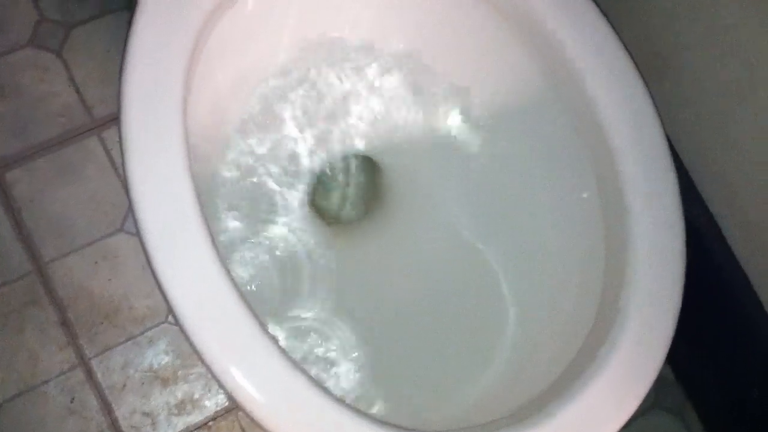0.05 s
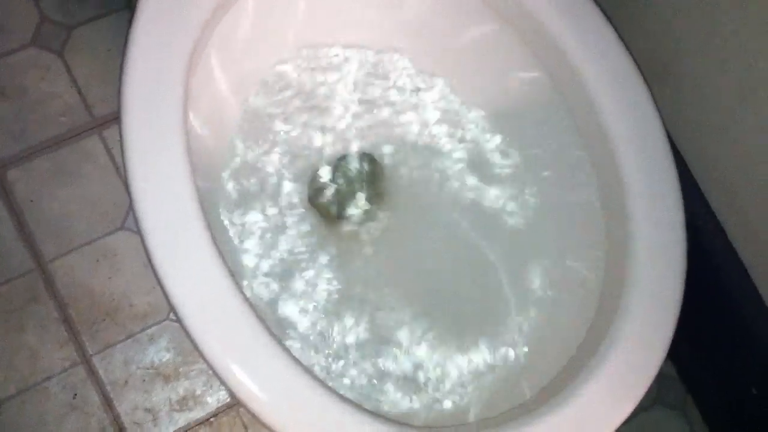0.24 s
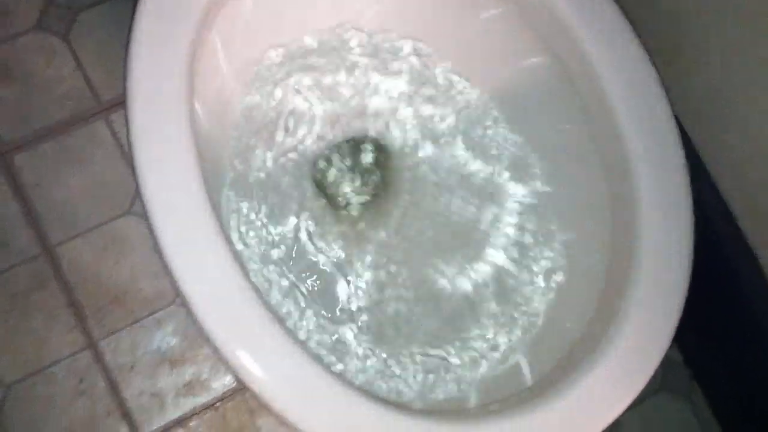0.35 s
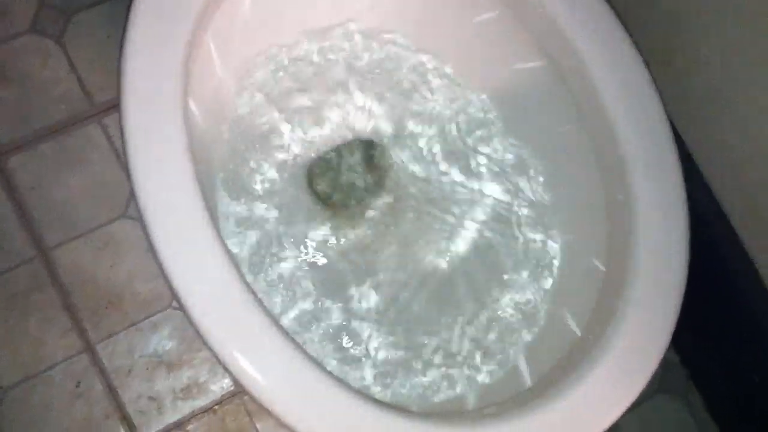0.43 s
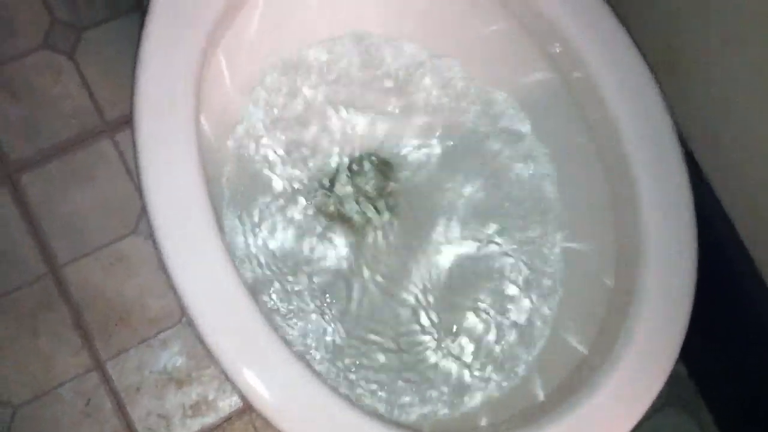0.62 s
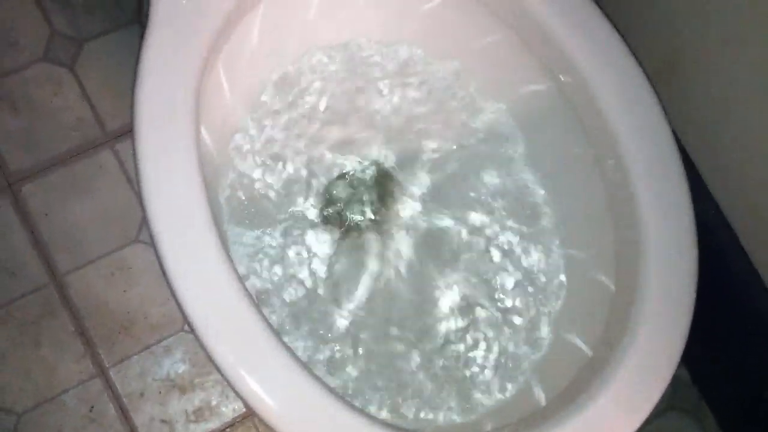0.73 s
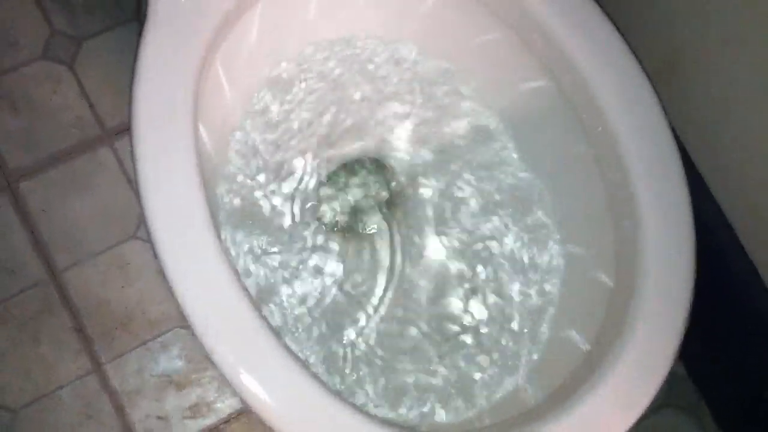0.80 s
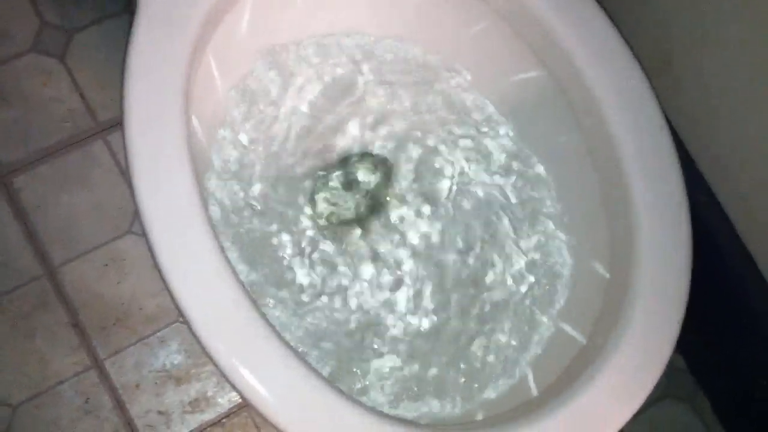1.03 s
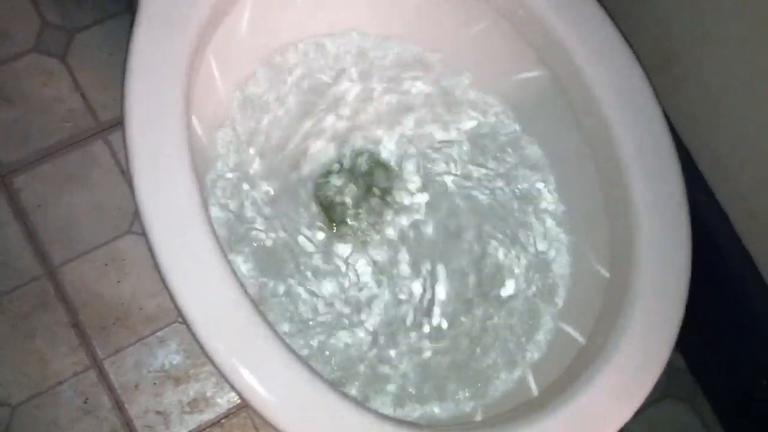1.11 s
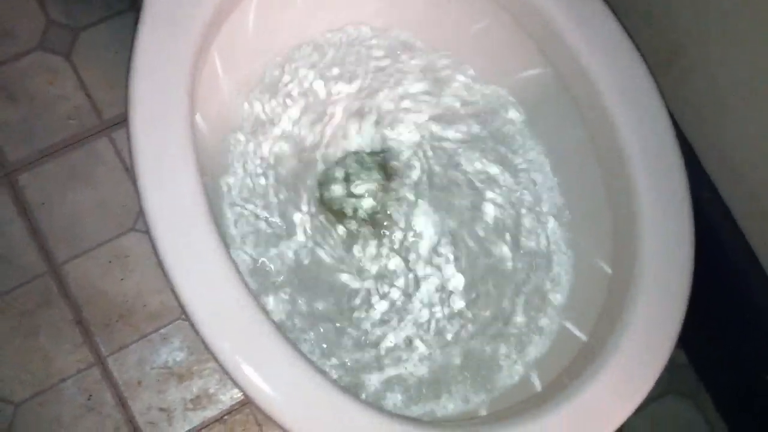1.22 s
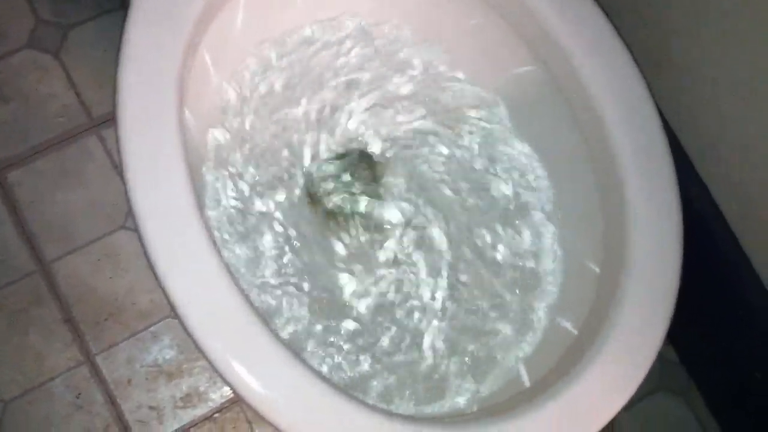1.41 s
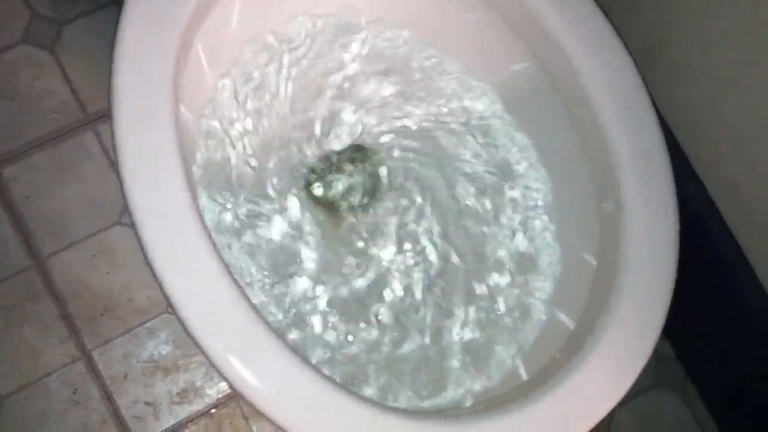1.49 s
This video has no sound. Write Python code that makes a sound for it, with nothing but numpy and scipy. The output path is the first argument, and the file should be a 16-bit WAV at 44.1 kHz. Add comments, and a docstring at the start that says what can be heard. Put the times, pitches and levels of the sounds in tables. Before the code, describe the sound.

A toilet flushes, heard close in a small tiled bathroom. Faint hollow tank sounds and sharp lever ticks come first, from 0 to 0.25 s. At about 0.27 s the valve opens with a loud boomy gush, short clang and bright splash, peaking until 0.4 s. Another click falls at 0.44 s. Water slaps the bowl around 0.6-0.75 s and faintly at 1.1 s, while a quieter, flickering swirl continues to the cut at about 1.55 s.

```python
"""A toilet is flushed in a small tiled bathroom. Lever and chain tick: short bursts of filtered noise.
The valve lifts with a hollow gush and a brief clang, and the tank's tube hums: noise through resonances.
Water runs from the rim as splash, wash and spray, and slaps the bowl in short pitched bursts of drops.
It swirls on while the air of bowl and drain rings in a few broad, flickering tones."""
import sys
import numpy as np
from scipy import signal
from scipy.fft import rfft, irfft, next_fast_len
from scipy.io import wavfile
from scipy.ndimage import uniform_filter1d

SR = 44100
rng = np.random.default_rng(int(sys.argv[2]) if len(sys.argv) > 2 else 0)


def inscribe(sig):
    """Save sig as 16-bit PCM at rate SR to the path in sys.argv[1].

    A 1-D sig is mono; a 2-D sig holds one channel per row.
    Samples are clipped to [-1, 1] before scaling.
    """
    pcm = np.round(np.clip(np.atleast_2d(sig).T, -1, 1) * 32767)
    wavfile.write(sys.argv[1], SR, pcm.astype(np.int16))


N = 68355  # samples


def amp(db):
    """Decibels to a linear factor."""
    return 10 ** (np.asarray(db) / 20)


def rms_one(x):
    """Scale to an rms of 1."""
    return x / np.sqrt(np.mean(x ** 2) + 1e-20)


def band_pass(x, order, low_hz, high_hz):
    """Keep only the band between two edges."""
    return signal.sosfilt(signal.butter(order, [low_hz, high_hz], "band", fs=SR, output="sos"), x)


def in_time(rows):
    """Columns of a curve table, one value per sample; the first and last rows hold outside the table."""
    start_s, *columns = np.transpose(rows)
    t = np.arange(N) / SR
    return [np.interp(t, start_s, column) for column in columns]


TANK_FADE_S, TANK_FADE_DB = 0.082, -4


def fading(rows):
    """A tank curve that sinks a little after its last row, then holds."""
    last_s, *last_db = rows[-1]
    sunk = (last_s + TANK_FADE_S, *(np.array(last_db) + TANK_FADE_DB))
    return in_time(list(rows) + [sunk])


def drift(rate_hz):
    """Slow chance with spread 1: noise through two equal poles at rate_hz, one value per 40 samples."""
    step = 40
    r = np.exp(-2 * np.pi * rate_hz * step / SR)
    noise = rng.standard_normal(N // step + 2002)
    slow = signal.lfilter([1], [1, -2 * r, r * r], noise)[2000:]  # drop the run-in
    return np.interp(np.arange(N) / step, np.arange(len(slow)), rms_one(slow))


DROPS_PER_S, DROP_SPREAD_DB = 3000, 3.5
DROP_SHARE = 0.55  # of the power; the rest is smooth noise


def water():
    """Turbulence: smooth noise mixed with a hail of uneven drops."""
    unevenness = np.minimum(rng.exponential(1, N), 5)
    sizes = amp(DROP_SPREAD_DB * unevenness) * rng.choice([-1, 1], N)
    drops = rms_one(sizes * (rng.random(N) < DROPS_PER_S / SR))
    return np.sqrt(DROP_SHARE) * drops + np.sqrt(1 - DROP_SHARE) * rng.standard_normal(N)


FLICKER_HZ = 22.2  # how fast the resonances flicker


def resonate(x, modes, flicker_db, steady, order=1):
    """Parallel resonances, each flickering on its own; steady 0-1 evens out their swells; rms 1."""
    out = 0
    for k, (pitch_hz, width_hz, level_db) in enumerate(modes):
        r = np.exp(-np.pi * width_hz / SR)
        gain = (1 - r * r) / 2
        stage = [gain, 0, -gain, 1, -2 * r * np.cos(2 * np.pi * pitch_hz / SR), r * r]
        ring = signal.sosfilt([stage] * order, x)
        power = uniform_filter1d(ring ** 2, size=SR // 60) / np.mean(ring ** 2)
        swell = np.sqrt(power + .03)
        level = amp(level_db + flicker_db * drift(FLICKER_HZ))
        out = out + (-1) ** k * level * ring / swell ** steady  # alternate signs
    return rms_one(out)


def coloured(spectrum, patchy_db):
    """Third-octave bands of water noise, each at its own level and patchy; rms 1."""
    pitch_hz, density_db = np.transpose(spectrum)
    source = [water(), water()]  # neighbouring bands take turns
    edges = pitch_hz[0] * 2 ** np.arange(0, np.log2(pitch_hz[-1] / pitch_hz[0]), 1 / 3)
    out = 0
    for k, low in enumerate(edges):
        high = low * 2 ** (1 / 3)
        band = band_pass(source[k % 2], 2, low, high)
        band_db = np.interp(np.log(low * high) / 2, np.log(pitch_hz), density_db)
        out = out + amp(band_db + patchy_db * drift(13.5)) * band
    return rms_one(out)


def puffs(rows, source, rise_s, span):
    """Each row is a short burst around its pitch: it rises, then dies fast."""
    out, t = np.zeros(N + SR), np.arange(SR // 4) / SR
    for start_s, level_db, pitch_hz, t60_s in rows:
        i = int(start_s * SR)
        shape = amp(level_db - 60 * t / t60_s) * np.minimum(t / rise_s, 1)
        burst = band_pass(source[i:i + len(t)], 3, pitch_hz / span, pitch_hz * span) * shape
        out[i:i + len(t)] += rms_one(burst) * np.sqrt(np.mean(shape ** 2))
    return out[:N]


ROOM_T60_S, ROOM_DB = 0.21, -4


def bathroom(x):
    """Echoes between tiled walls: eight feedback delays of 11 to 29 ms, computed as a spectrum."""
    size = next_fast_len(N + SR)
    w = 2 * np.pi * np.arange(size // 2 + 1) / size
    echo = 0
    for k, lag in enumerate((SR * np.linspace(.011, .029, 8)).astype(int)):
        feedback = amp(-60 * lag / SR / ROOM_T60_S)
        loop = 1 / (1 - feedback * np.exp(-1j * w * lag)) - 1  # without the direct sound
        echo = echo + (-1) ** k * loop
    return irfft(rfft(x, size) * echo, size)[:N] / np.sqrt(8)


# drain drone: start_s, level_db
DRAIN_LEVEL = [(0.0, -54.5), (0.132, -62.5), (0.272, -41.5), (0.354, -78), (0.508, -60.5), (0.6, -47.5),
               (1.55, -49.5)]
# resonances of the drain: pitch_hz, width_hz, level_db (relative)
DRAIN_TONES = [(99, 14, -11.5), (165.4, 7.6, 2.5), (224, 26, -6)]


def drain():
    """The turning water sets the air of the drain droning."""
    (level_db,) = in_time(DRAIN_LEVEL)
    return amp(level_db) * resonate(water(), DRAIN_TONES, flicker_db=1.5, steady=0.37)


# hum of the tank's tube: start_s, main_db, side_db
HUM_LEVEL = [(0.0, -64, -66.5), (0.055, -38, -59), (0.094, -43, -60), (0.115, -71, -53),
             (0.152, -38.5, -52), (0.2, -48, -53), (0.268, -40, -45), (0.335, -32.5, -32),
             (0.37, -29, -30.5), (0.44, -50, -38), (0.52, -38.5, -41.5), (0.565, -38, -35), (0.6, -38, -53),
             (0.636, -70, -46), (0.76, -48, -42), (0.88, -52, -48)]
# main and side resonances of the tube: pitch_hz, width_hz (of each of two stages), level_db (relative)
TUBE_MAIN = [(1401, 16, 0)]
TUBE_SIDES = [(1054, 26, -4), (1750, 24, 0)]


def tube_hum():
    """Water noise excites narrow tones in the tank's tube."""
    main_db, side_db = fading(HUM_LEVEL)
    main = resonate(water(), TUBE_MAIN, flicker_db=3.0, steady=1.0, order=2)
    sides = resonate(water(), TUBE_SIDES, flicker_db=3.0, steady=0.7, order=2)
    return amp(main_db) * main + amp(side_db) * sides


# ticks of lever and chain: start_s, level_db (decay start, before the rise), pitch_hz, t60_s
TICK_HITS = [(.1216, -36, 7430, 0.02), (.157, -31.5, 6700, 0.031), (.1974, -24.5, 3250, 0.015),
             (.2374, -29.5, 7600, 0.022), (.2670, -19, 2420, 0.019), (.4374, -25, 6950, 0.035),
             (.4380, -27, 8800, 0.038)]


def ticks():
    """Lever and chain tick: sharp bursts of band-passed noise."""
    return puffs(TICK_HITS, rng.standard_normal(N), rise_s=0.00049, span=1.26)


# valve lifting, felt in the tank: start_s, boom_db, rattle_db
GUSH_LEVEL = [(0.0, -34.5, -38), (0.038, -40.5, -63), (0.056, -33.5, -41.5), (0.1, -52, -47),
              (0.112, -35, -52), (0.208, -44.5, -43.5), (0.23, -35, -44.5), (0.27, -19, -25.5),
              (0.296, -18, -27), (0.34, -24.5, -33), (0.488, -66, -42.5), (0.52, -51, -46.5)]
# valve seat ringing briefly at the top of the gush: start_s, level_db
CLANG_CURVE = [(.25, -49), (.286, -22), (.318, -27), (.35, -53), (.42, -80)]
# resonances of tank, valve and seat: pitch_hz, width_hz (of each stage; the seat has two), level_db (relative)
TANK_TONES = [(246.4, 9, -4), (293.7, 19.7, 0), (334.2, 34, -4), (405, 44, -11)]
VALVE_TONES = [(633, 84, -2.5), (748, 132, -3), (1081, 56, -6.5)]
SEAT_TONES = [(1035, 12, 0), (1084, 15, 0)]


def gush():
    """The lifting valve drives the tank's hollow boom, its own rattle and the clang of its seat."""
    boom_db, rattle_db = fading(GUSH_LEVEL)
    (clang_db,) = in_time(CLANG_CURVE)
    thin = signal.sosfilt(signal.butter(4, 200, "high", fs=SR, output="sos"), water())
    boom = resonate(thin, TANK_TONES, flicker_db=2.0, steady=0.75)
    rattle = resonate(water(), VALVE_TONES, flicker_db=2.0, steady=0.99)
    clang = resonate(water(), SEAT_TONES, flicker_db=3.0, steady=0.75, order=2)
    return amp(boom_db) * boom + amp(rattle_db) * rattle + amp(clang_db) * clang


# slaps of water on the bowl: start_s, level_db (decay start, before the rise), pitch_hz, t60_s
SLAP_HITS = [(.1420, -26, 1950, 0.065), (.3080, -19.5, 3660, 0.14), (.3250, -23.5, 3800, 0.19),
             (.3750, -21, 2800, 0.15), (.6050, -24.5, 2360, 0.069), (.7150, -25, 2660, 0.13),
             (.7550, -23.5, 2430, 0.12), (1.092, -31.5, 3750, 0.16)]


def slaps():
    """Water slaps the bowl: softer-edged bursts of band-passed water noise."""
    return puffs(SLAP_HITS, water(), rise_s=0.012, span=1.282)


# air over the swirl: start_s, low_db, middle_db, high_db (hissing tone, before its flutter)
SWIRL_LEVEL = [(.3, -46.5, -51.5, -59), (.5, -50, -43, -64), (.56, -42, -40.5, -39), (.7, -42.5, -40, -53),
               (.88, -43.5, -40, -44.5), (1.02, -51, -42, -39), (1.08, -35.5, -41, -48.5),
               (1.18, -64, -39, -40.5), (1.28, -38.5, -43, -39.5), (1.34, -48, -41, -40.5),
               (1.4, -44, -40, -36.5), (1.55, -44.5, -39.5, -39.5)]
# low, middle and high resonances of the bowl: pitch_hz, width_hz (of each stage; low and high have two),
# level_db (relative)
BOWL_LOW_TONES = [(312, 42, -6), (338, 30, 6.5)]
BOWL_TONES = [(764, 105, -5), (1185, 26.5, 2.5), (1248, 22, 3), (1344, 23, 4.5), (1782, 33, -7),
              (2162, 18, -4)]
BOWL_HIGH_TONES = [(3004, 84, -1), (3100, 23, -2.5), (3135, 82, -0.5), (3784, 210, -9)]
FLUTTER_HZ, FLUTTER_DB = 35, 1.5  # the high tone trembles


def swirl():
    """The turning water sets the air of the bowl ringing."""
    low_db, middle_db, high_db = in_time(SWIRL_LEVEL)
    low = resonate(water(), BOWL_LOW_TONES, flicker_db=1.5, steady=0.63, order=2)
    middle = resonate(water(), BOWL_TONES, flicker_db=1.5, steady=0.44)
    flutter_db = FLUTTER_DB * drift(FLUTTER_HZ)
    high = resonate(water(), BOWL_HIGH_TONES, flicker_db=1.5, steady=0.92, order=2)
    return amp(low_db) * low + amp(middle_db) * middle + amp(high_db + flutter_db) * high


# water leaving the rim: start_s, splash_db (before the 5 dB trim), spray_db
RIM_LEVEL = [(0.0, -53.5, -53), (0.112, -44, -56.5), (0.158, -48, -52), (0.18, -41, -51), (0.224, -39, -43),
             (0.25, -38, -37), (0.274, -23.5, -24.5), (0.31, -21.5, -26), (0.335, -18.5, -37.5),
             (0.43, -39.5, -45.5), (0.44, -30, -37), (0.466, -34, -41.5), (0.626, -34, -43),
             (0.742, -33.5, -46.5), (0.858, -37.5, -46.5), (0.97, -38.5, -46.5), (1.55, -37.5, -46.5)]
# ringing of the splash: pitch_hz, width_hz, level_db (relative)
SPLASH_TONES = [(2001, 37, -1.5), (2383, 73, -3), (2605, 37, -0.5), (2725, 38, -1), (3018, 58, -2),
                (3404, 16, -0.5), (4020, 16, -1)]
# water between the tones: pitch_hz, density_db (relative, per Hz)
WASH_SPECTRUM = [(35, -58), (60, -21), (160, -17), (275, -36), (333, 5), (463, -1), (962, -15), (1210, -7),
                 (1590, -3), (3060, -6.5), (6000, -8.5), (8000, -51)]
# bright spray: pitch_hz, density_db (relative, per Hz)
SPRAY_SPECTRUM = [(2650, -13), (4500, -7.5), (5230, -17), (5900, -3), (6630, -2.5), (10700, -8.5),
                  (14000, -18.5), (15500, -49)]
BROAD_DB, WASH_DB = -0.5, -2  # against the ringing splash


def rim():
    """Jets from the rim: ringing splash, broad wash and bright spray."""
    splash_db, spray_db = in_time(RIM_LEVEL)
    broad = rms_one(band_pass(water(), 2, 1900, 5000))
    ringing = resonate(water(), SPLASH_TONES, flicker_db=4.5, steady=0.12)
    wash = coloured(WASH_SPECTRUM, patchy_db=2.0)
    splash = ringing + amp(BROAD_DB) * broad + amp(WASH_DB) * wash
    spray = coloured(SPRAY_SPECTRUM, patchy_db=2.5)
    return amp(splash_db - 5) * splash + amp(spray_db) * spray


def scene():
    """Tank above, water in bowl and drain; only ticks and slaps get room echoes."""
    hits = ticks() + slaps()
    echoes = amp(ROOM_DB) * bathroom(hits)
    flow = gush() + tube_hum() + rim() + swirl() + drain()
    return (flow + hits + echoes)[None]


def record(dry):
    """The small microphone softens the deep bass; the top is cut."""
    x = signal.sosfilt(signal.butter(1, 60, "high", fs=SR, output="sos"), dry)
    return signal.sosfilt(signal.cheby2(12, 70, 15800, fs=SR, output="sos"), x)  # 70 dB down at 15.8 kHz


dry = scene()
out = record(dry)
inscribe(out)
```